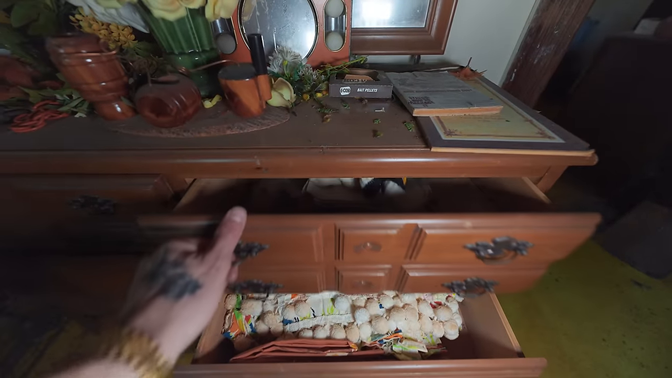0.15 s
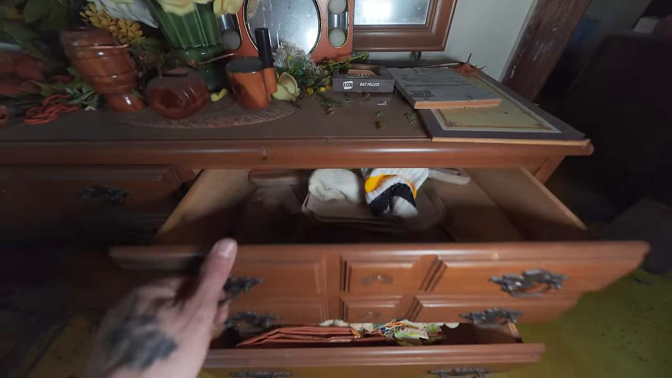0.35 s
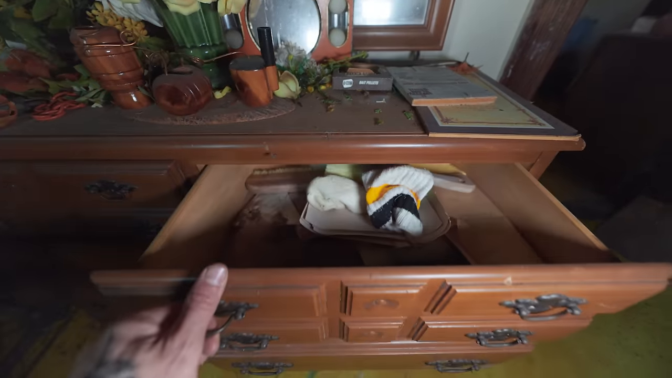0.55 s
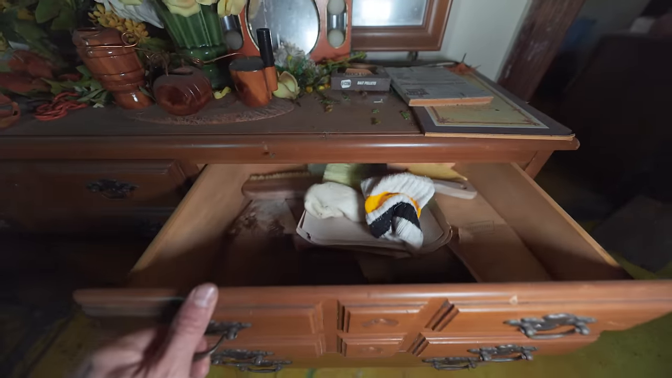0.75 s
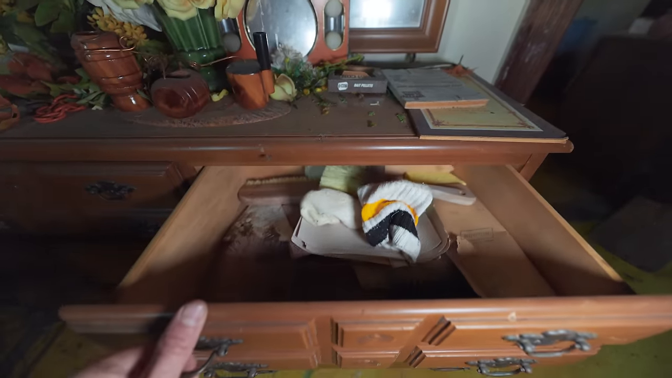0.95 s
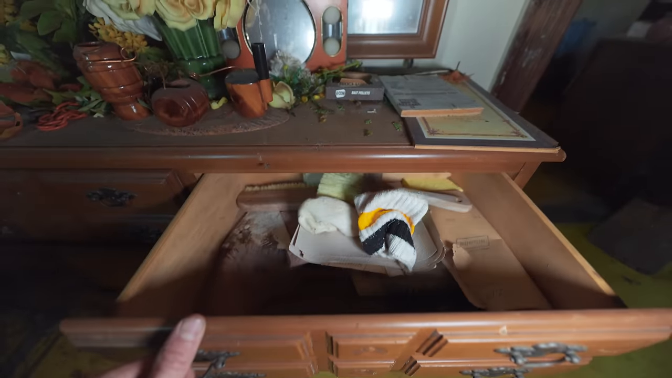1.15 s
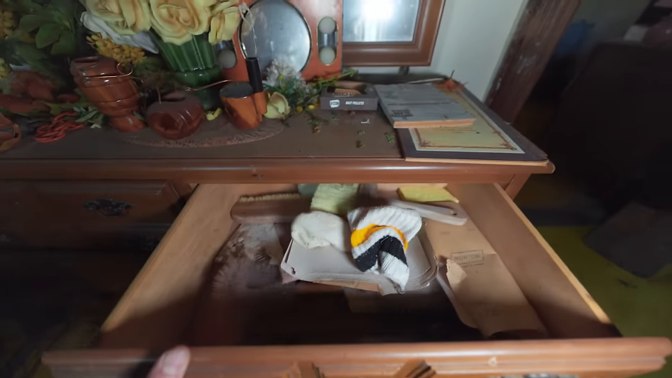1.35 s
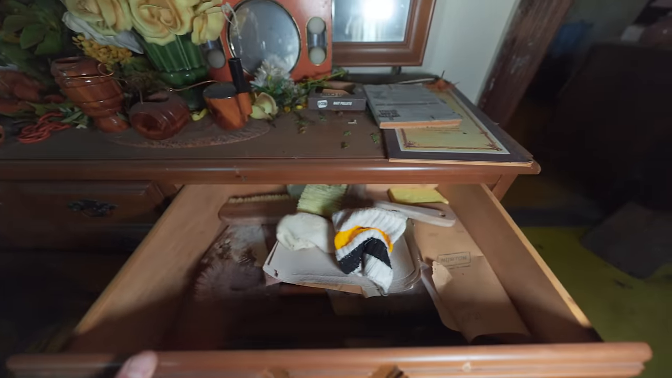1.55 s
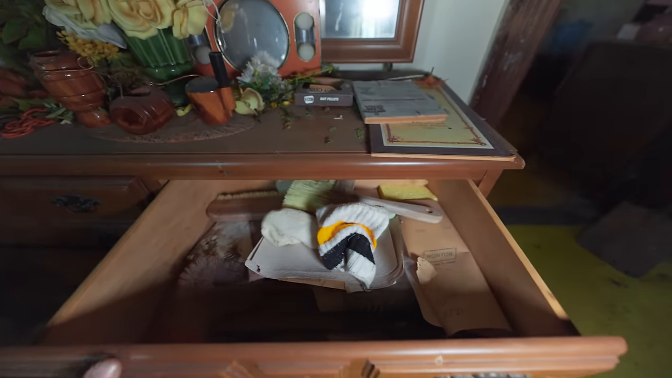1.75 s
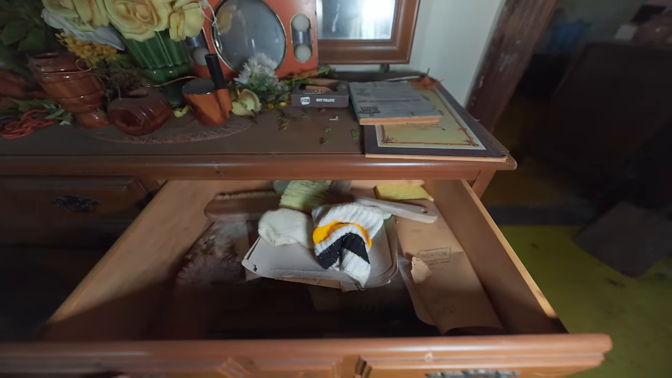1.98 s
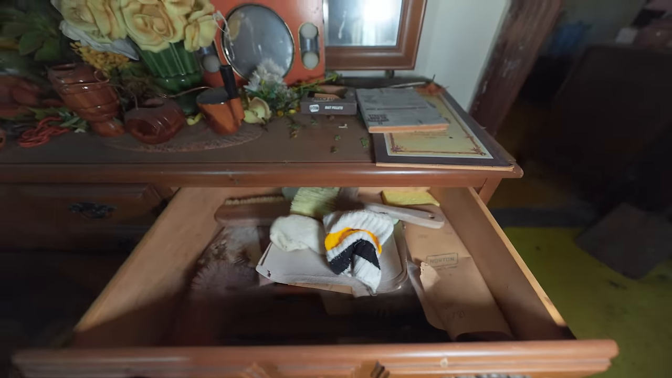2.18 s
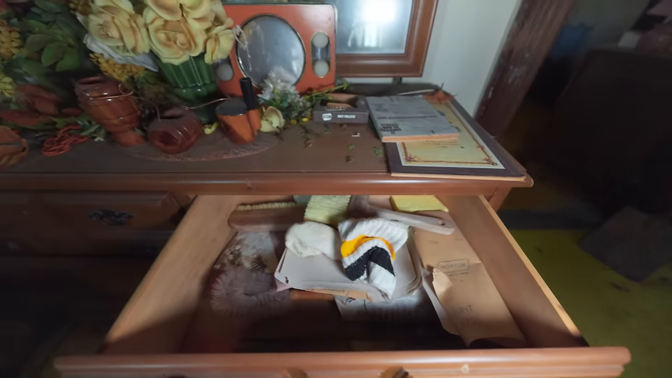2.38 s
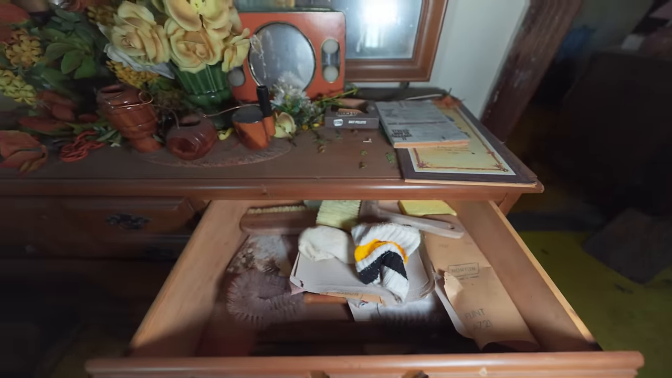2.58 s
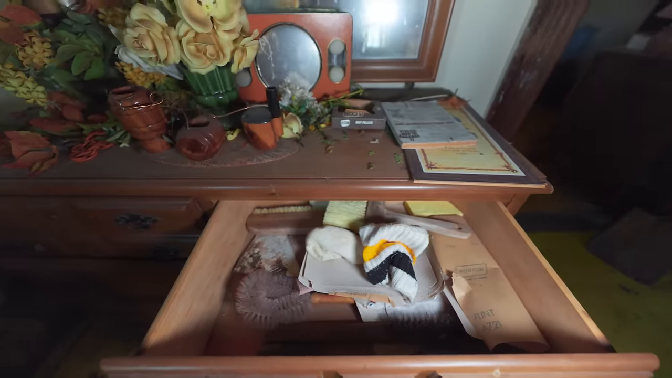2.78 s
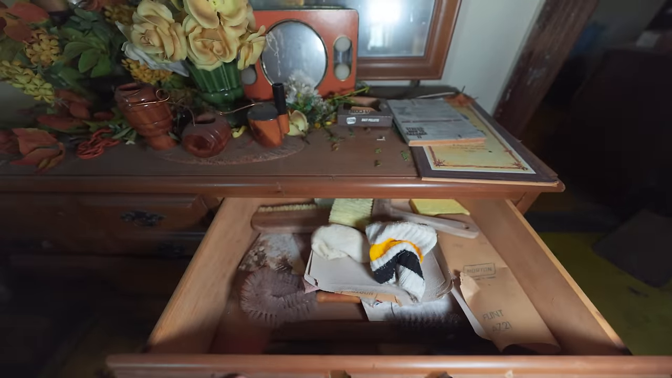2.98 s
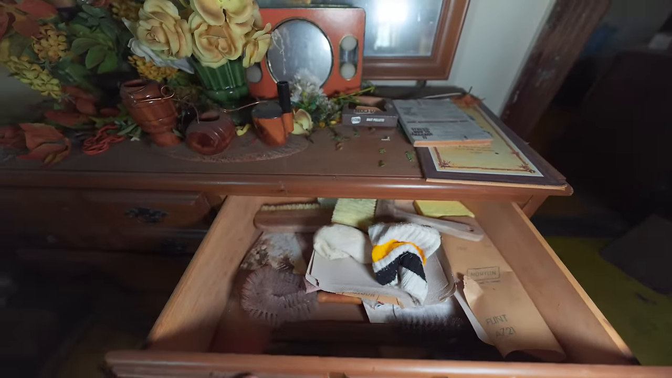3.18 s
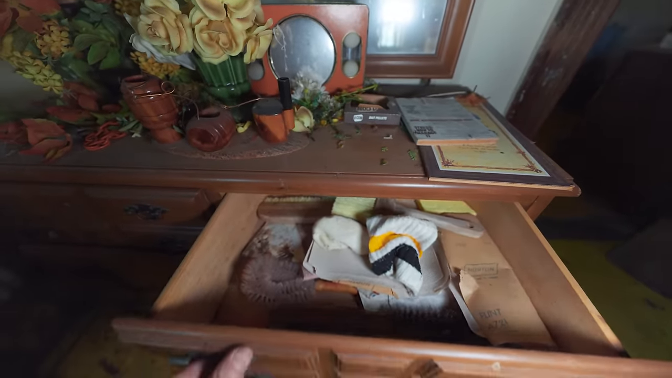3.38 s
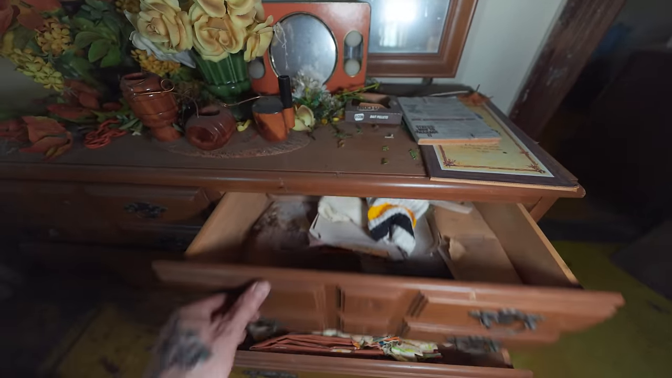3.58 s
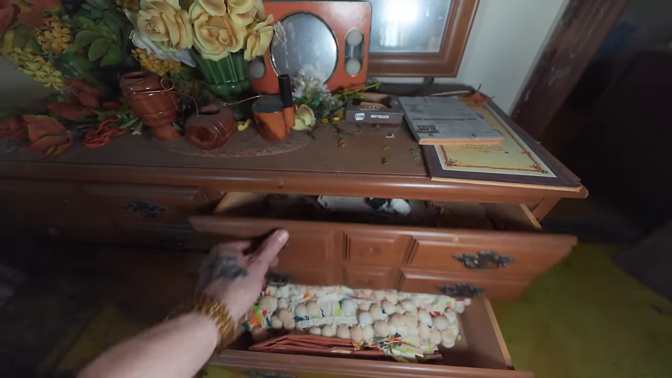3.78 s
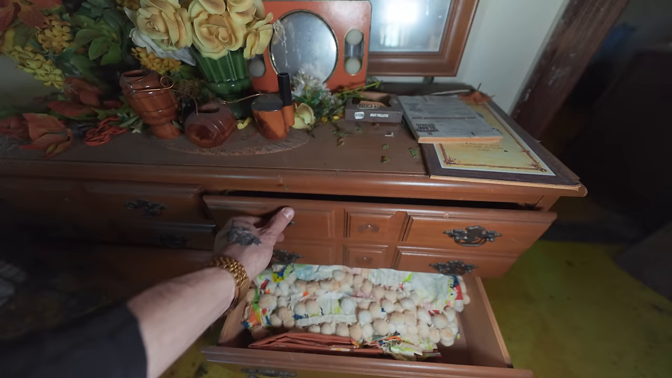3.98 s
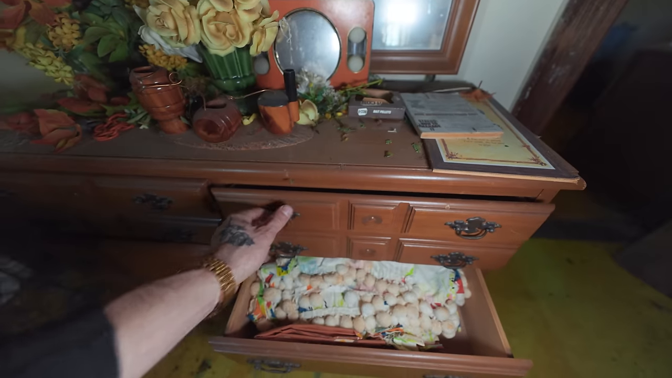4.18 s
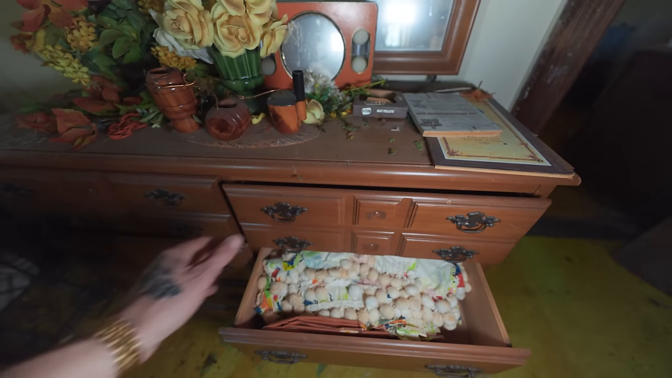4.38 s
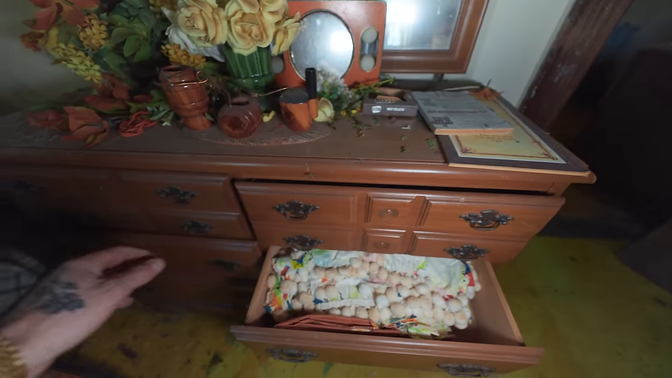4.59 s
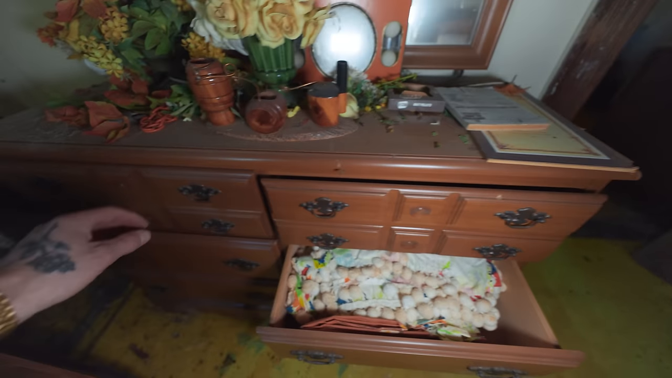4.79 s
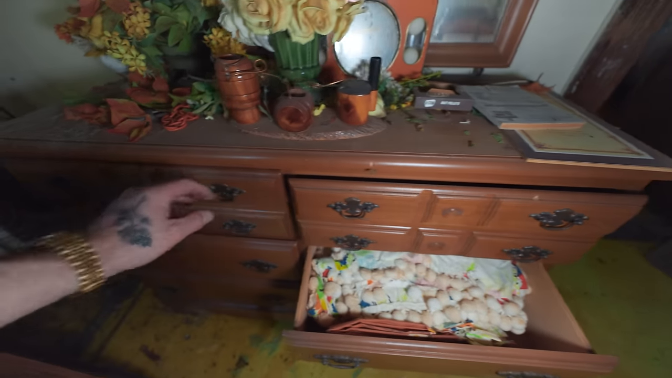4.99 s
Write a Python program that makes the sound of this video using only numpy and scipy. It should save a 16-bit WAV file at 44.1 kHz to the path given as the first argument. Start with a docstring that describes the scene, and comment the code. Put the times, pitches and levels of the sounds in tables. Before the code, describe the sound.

A wooden dresser drawer is heard close up in a small quiet room. It starts sliding out at once, with a hollow, juddering scrape and a few sharp catches, easing into softer rubbing by about 0.7 seconds. A second pull runs from about 1.1 to 2.2 seconds, with short wooden cracks around 1.4, 1.6 and 1.9. The drawer then mostly rests, with slight rubs and light clicks of loose fittings between 2.4 and 3.2 seconds. From 3.3 it is pushed back, scraping, rumbling and knocking on its runners, softening after 4.1. At 4.3 the hanging metal pull drops on its back plate with a sharp clack and bounces three times, each weaker. The drawer front bumps home at about 4.65 seconds with a firm cluster of wooden knocks. Faint rubbing and a small tick follow near 5 seconds over low room tone.

```python
"""A wooden dresser drawer, close to one microphone in a small quiet room.
It is pulled out in two stages, rests, and is pushed shut, rubbing, juddering and catching on its
wooden runners. Jolts set its hanging metal pull ringing; loose fittings click while it stands open.
Let go, the pull drops and bounces on its back plate, then the drawer front bumps home."""
import sys
import numpy as np
from scipy import signal
from scipy.fft import rfft, irfft, next_fast_len
from scipy.io import wavfile

SR = 44100
rng = np.random.default_rng(int(sys.argv[2]) if len(sys.argv) > 2 else 0)


def log_audio(samples):
    """Write samples as a 16-bit WAV file to the path given in sys.argv[1]."""
    # one column per channel
    frames = np.atleast_2d(samples).T
    # limit to full scale, then quantise
    limited = np.clip(frames, -1, 1)
    pcm = np.round(limited * 32767).astype(np.int16)
    wavfile.write(sys.argv[1], SR, pcm)


N = 222264
TIME = np.arange(N) / SR
TAIL = TIME[:SR * 3 // 5]  # time axis of one ring-out

# Levels in the tables are relative: each source adds its own gain.
# room tone: frequency_hz, level_db
ROOM_TONE_SPECTRUM = [(21, -39), (35, -7.5), (101, 4), (256, -14.5), (453, -8), (489, -15), (557, -13),
                      (864, -22), (2250, -20), (3490, -24.5), (3870, -26), (5020, -33), (8630, -29),
                      (13700, -28.5), (16900, -54.5)]
# room decay: frequency_hz, t60_s
ROOM_DECAY = [(100, 0.83), (500, 0.48), (1400, 0.79), (3700, 0.34), (10000, 0.32), (16000, 0.26)]

# moves of the drawer: contact, start_s, attack_s, slowing_from_s, release_s, sag_db_per_s,
# rub_db, sides_db, hiss_db, box_db
DRAWER_STROKES = [("pull", -0.14, 0.33, .46, 0.39, 22.2, -39.5, -52, -50, -36.5),
                  ("glide", 0.49, 0.22, 0.96, 0.19, 11.8, -50.5, -50, -64.5, -56),
                  ("pull", 1.117, 0.31, 1.42, 0.13, 0, -48, -54, -64.5, -64.5),
                  ("tipped", 1.637, 0.15, 2.003, 0.28, 0, -45.5, -64.5, -65, -53.5),
                  ("tipped", 2.36, 0.065, 2.52, 0.11, 0, -58, -82, -86, -62),
                  ("push", 2.9, 0.045, 2.77, 0.043, 0, -50, -46, -83, -57),
                  ("push", 3.06, 0.068, 3.21, 0.17, 0, -60.5, -75, -78, -63.5),
                  ("push", 3.27, 0.31, 3.91, 0.22, 0, -42.5, -54.5, -55.5, -40.5),
                  ("push", 3.7, 0.25, 5.1, 0.15, 15, -51, -77, -74, -46)]
# runner rub when pulled, gliding, tipped at full reach and pushed back: frequency_hz, level_db
PULLING_SPECTRUM = [(150, -27), (250, -10), (331, -19), (361, 2.5), (395, -12), (509, -1.5), (556, -10),
                    (673, 3), (825, -8), (1210, -5.5), (1420, -13.5), (2340, -12), (3330, -16.5),
                    (4300, -17.5), (5200, -52), (6760, -53), (11400, -120)]
GLIDING_SPECTRUM = [(150, -34), (250, -16), (342, -7.5), (381, -24), (437, -2), (551, -13), (705, 0),
                    (888, -13), (1170, -4), (1450, -20), (2400, -12.5), (2640, -18), (4260, -18),
                    (5020, -44), (6500, -45), (8450, -55), (14300, -120)]
TIPPED_SPECTRUM = [(150, -42), (250, -9.5), (398, -2), (430, 4), (509, -4), (751, -2.5), (960, -14),
                   (1430, -11.5), (1590, -8), (1860, -20), (2110, -11), (2310, -17), (4030, -21),
                   (4900, -53), (5500, -40), (7150, -66), (12100, -120)]
PUSHING_SPECTRUM = [(150, -41), (250, -9), (354, -2), (471, -4), (704, 1.5), (801, -6), (1280, -6.5),
                    (1610, -15.5), (1880, -13.5), (2060, -10), (2740, -11), (4030, -17.5), (4410, -19.5),
                    (4960, -43), (5500, -35), (7150, -50.5), (12100, -120)]
# hiss of the wood grain: frequency_hz, level_db
GRAIN_SPECTRUM = [(2650, -39), (4500, 2), (5110, -12.5), (6000, 0), (6490, -4), (8750, -8), (12800, -7.5),
                  (15100, -22), (16100, -43), (16900, -82)]
# hollow resonances of the drawer box and of its sides: pitch_hz, width_hz, level_db
BOX_RESONANCES = [(52, 14, -10), (89.3, 18, 3), (135, 12.5, 5.5), (194, 27, -4)]
SIDE_RESONANCES = [(676, 31, -6.5), (1138, 26, -3.5), (1258, 100, -10), (2615, 98, -9)]
# stick-slip judders of the box: middle_s, half_length_s, pitch_hz, level_db
BOX_JUDDERS = [(0.006, 0.056, 104, -31), (0.088, 0.036, 97, -29.5), (0.24, 0.042, 184, -36.5),
               (0.33, 0.045, 133, -26), (0.65, 0.098, 138, -44), (1.54, 0.014, 152, -43),
               (1.62, 0.054, 140, -44.5), (3.443, 0.02, 144, -33), (3.694, 0.072, 128, -33.5),
               (3.866, 0.052, 185, -37), (3.977, 0.036, 190, -36.5), (4.203, 0.01, 110, -37.5)]
# jolts that reach the hanging pull: start_s, level_db
PULL_JOLTS = [(0.056, -51), (3.9, -61), (3.974, -56)]

# blows on the carcass, runners, fittings and pull: start_s, level_db, bass_db, treble_db, spot_hz
CARCASS_KNOCKS = [(.016, -28.5, 12.5, -0.5, 222), (1.514, -31, 4, -22, 480), (3.407, -27, 6, -1.5, 540),
                  (3.436, -31.5, 8.5, -3, 284), (3.621, -23, 0, -15, 1154), (3.634, -27, 7, -19, 510),
                  (4.645, -11, -8.5, 1, 753), (4.651, -14.5, -8.5, -12, 405), (4.663, -13.5, 5, 5, 574),
                  (4.705, -19.5, -2.5, 9, 2485), (4.721, -25.5, 4, 13.5, 1600)]
RUNNER_CATCHES = [(.057, -19, -3, 4.5, 3830), (.061, -25, 2, 0, 1070), (.088, -25, -17, -10, 3700),
                  (.134, -23, -10, -1, 2300), (1.387, -23, -1, 1, 1370), (1.608, -17, -2.5, -2, 702),
                  (1.899, -23, 0.5, -9, 1080), (2.443, -43, 0, -22, 1100), (3.57, -26.5, -1, 3, 4450),
                  (3.827, -19, 0.5, -2.5, 1700), (3.974, -20.5, 3, 3, 1700), (4.132, -29, 0, -0.5, 1610),
                  (4.309, -30, -3.5, -12, 2010), (4.445, -18.5, 7, -17, 1080), (5.003, -42, 16.5, -3, 1076)]
FITTING_CLICKS = [(2.374, -28.5, 13, 2, 3770), (2.573, -30, 9, -8.5, 3330), (2.921, -23, 9, 2, 3350),
                  (2.924, -21.5, -6, -13, 3350), (3.08, -34, 11, -19, 3250), (3.201, -21.5, 5.5, 5, 3720),
                  (4.172, -20.5, -30, 0, 3650), (4.231, -15.5, -5.5, 4.5, 4940)]
PULL_BOUNCES = [(4.3127, -2.5, 1, -0.5, 4160), (4.4619, -10.5, 1, 1, 3530), (4.616, -18, 2.5, -1, 3520),
                (4.788, -26, -24, -6, 3800)]
# the crack of each kind of blow: frequency_hz, level_db
KNOCK_SPECTRUM = [(35, -40.5), (60, -14), (87, -5.5), (323, -11), (398, -10.5), (480, -13.5), (553, -12),
                  (822, -14.5), (1410, -20), (2350, -26), (4320, -29), (5210, -37.5), (11800, -38),
                  (14200, -45), (16000, -58)]
CATCH_SPECTRUM = [(180, -16.5), (300, -7), (420, -16), (686, -4), (1590, -3.5), (2930, -11), (3460, -9),
                  (4310, -10), (5020, -26.5), (7030, -14), (7920, -22.5), (11700, -22), (13600, -33),
                  (15300, -38), (16900, -96)]
CLICK_SPECTRUM = [(150, -59), (250, -19), (1060, -12), (1310, -11), (2000, -12), (2520, -3), (2800, -7),
                  (3400, -3), (3980, -7.5), (4670, -15), (6640, -12.5), (7250, -20), (12500, -21.5),
                  (15800, -35), (16900, -66)]
BOUNCE_SPECTRUM = [(180, -16.5), (300, -20.5), (600, -3), (1100, -10), (2300, -13), (3100, -7.5),
                   (3500, 2.5), (4300, -13.5), (4900, -14.5), (5600, -12.5), (8000, -6), (9800, -16.5),
                   (14200, -21.5), (16500, -39)]
# the modes each kind leaves ringing: pitch_hz, level_db, t60_s
KNOCK_RING = [(49, -12, .8), (88, -4, .5), (135, -8, .33), (198, -13, .14), (360, -7, .1), (405, -2, .15),
              (548, -3, .14), (689, -4, .08), (764, -2, .09), (812, 0, .08), (890, -2, .08), (977, -2, .08)]
CATCH_RING = [(692, -1.5, 0.11), (1205, -0.5, 0.041), (1360, -8, 0.062), (1600, 2, 0.017),
              (2530, -0.5, 0.027), (3354, 5, 0.014), (3470, -3.5, 0.029), (4150, -7, 0.015),
              (6360, -6.5, 0.016), (7100, -15, 0.018)]
CLICK_RING = [(368, -14.5, 0.1), (714, -11.5, 0.11), (1080, -4.5, 0.14), (1740, -4.5, 0.064),
              (2590, -1, 0.1), (3320, -3, 0.09), (3710, -8.5, 0.05), (4330, 0.5, 0.043), (4690, 2.5, 0.028),
              (6050, 2.5, 0.028), (8400, -4, 0.024), (9580, -0.5, .025)]
BOUNCE_RING = [(554, -19, .14), (1082, -6, .05), (1244, -16, .06), (1577, -16, .05), (2520, -18, .04),
               (3420, -8, .025), (3469, -22, .26), (3700, -9, .025), (4180, -4, .015), (4295, -1, .026),
               (4800, -12, .02), (7300, -11, .015), (8000, -5, .018), (8926, -12, .03), (10650, -14, .03),
               (10990, -26, .25), (11600, -13, .02), (12250, -13, .02), (14050, -12, .02)]


def amp(db):
    """Decibels to gain."""
    return np.exp(np.asarray(db) * (np.log(10) / 20))


def rms_one(x):
    """Scale to unit rms."""
    return x / np.sqrt(np.mean(x ** 2) + 1e-20)


def unit_energy(x):
    """Scale to unit energy."""
    return x / np.sqrt(np.sum(x ** 2, axis=-1, keepdims=True) + 1e-20)


def at_hz(points, hz):
    """Read a table on a log-frequency axis."""
    table_hz, value = np.transpose(points)
    return np.interp(np.log(np.maximum(hz, 1)), np.log(table_hz), value)


def coloured(x, spectrum):
    """Causal (minimum-phase) filter with the given spectrum."""
    length = x.shape[-1]
    size = 2 * next_fast_len(length // 2 + 2048, True)
    gain_db = at_hz(spectrum, np.arange(size // 2 + 1) * SR / size)
    cepstrum = irfft(gain_db * (np.log(10) / 20))
    cepstrum[1:size // 2] *= 2
    cepstrum[size // 2 + 1:] = 0
    return irfft(rfft(x, size) * np.exp(rfft(cepstrum)), size)[..., :length]


def drift(rate_hz):
    """A random wander of unit rms."""
    knots = rng.standard_normal(2000)
    return rms_one(np.interp(TIME * rate_hz, np.arange(len(knots)), knots))


def resonate(x, resonances):
    """Parallel resonances, each holding its given share of level."""
    out = 0
    for hz, width_hz, db in resonances:
        radius = np.exp(-np.pi * width_hz / SR)
        feedback = [1, -2 * radius * np.cos(2 * np.pi * hz / SR), radius * radius]
        out = out + amp(db) * rms_one(signal.lfilter([1, 0, -1], feedback, x))
    return rms_one(out)


def room_response(build_s, wall_s, wall_db):
    """Diffuse tail that dies sooner in the treble, with a swell of echoes from the far wall."""
    spectrum = rfft(rng.standard_normal(len(TAIL)))
    hz = np.arange(len(spectrum)) * SR / len(TAIL)
    centres = np.geomspace(80, 16000, 9)
    tail = 0
    for centre, weights in zip(centres, np.eye(len(centres))):
        band = irfft(spectrum * at_hz(np.c_[centres, weights], hz), len(TAIL))
        tail = tail + band * amp(-60 * TAIL / at_hz(ROOM_DECAY, centre))
    swell = 1 + amp(wall_db) * np.exp(-((TAIL - wall_s) / 0.019) ** 2)
    return unit_energy(tail * swell * (1 - np.exp(-TAIL / build_s)))


def in_room(x, room, wet_db):
    """What the room sends back to the microphone."""
    return amp(wet_db) * signal.fftconvolve(x, room)[:N]


def blows(events, colour, modes, room, wet_db, rise_s, crack_t60_s, ring_db, vary_db,
          spot_db, bass_hz, treble_hz):
    """Each blow is a crack of countless short modes plus a few that ring; hardness tilts its colour."""
    out = np.zeros((2, N + len(TAIL)))
    hz, mode_db, t60_s = np.transpose(modes)[:, :, None]
    partials = amp(mode_db - 60 * TAIL / t60_s) * np.sin(2 * np.pi * hz * TAIL)
    envelope = (1 - np.exp(-TAIL / rise_s)) * amp(-60 * TAIL / crack_t60_s)
    # summed over all directions the crack has a smooth spectrum: this is what fills the room
    smooth_crack = unit_energy(coloured(signal.unit_impulse(len(TAIL)), colour))
    for start_s, level_db, bass_db, treble_db, spot_hz in events:
        crack = unit_energy(coloured(rng.standard_normal(len(TAIL)) * envelope, colour))
        strengths = amp(rng.normal(0, vary_db, hz.shape)) * rng.choice([-1, 1], hz.shape)
        ring = amp(ring_db) * unit_energy(np.sum(strengths * partials, axis=0))
        tilt = [(bass_hz / 2, bass_db), (bass_hz * 2, 0), (treble_hz, 0), (treble_hz * 2, treble_db)]
        # the spot that is struck favours one narrow range of resonances
        spot = [(spot_hz / 1.18, 0), (spot_hz, spot_db), (spot_hz * 1.19, 0)]
        paths = np.array([crack + ring, smooth_crack + amp(-5) * ring])
        struck = unit_energy(coloured(paths, spot))
        start = int(start_s * SR)
        out[:, start:start + len(TAIL)] += amp(level_db) * coloured(struck, tilt)
    direct, radiated = out[:, :N]
    return direct + in_room(radiated, room, wet_db)


def room_tone():
    """The quiet room: a steady bed of noise, mostly bass."""
    return amp(-55.5) * rms_one(coloured(rng.standard_normal(N), ROOM_TONE_SPECTRUM))


def friction(per_s, spread_db, uneven_db):
    """Wood fibres snag and let go: dense tiny slips of uneven size, bunched by the grain."""
    slips = (rng.random(N) < per_s / SR) * rng.standard_normal(N)
    slips *= amp(spread_db * rng.standard_normal(N))
    return rms_one(slips * amp(uneven_db * drift(70)))


def stroke_speed(t, start_s, attack_s, slowing_s, release_s, sag_db_per_s):
    """The hand eases the drawer towards full speed (1), lets it sag and eases it to rest."""
    rise = np.clip((t - start_s) / attack_s, 0, 1)
    fall = np.clip(1 - (t - slowing_s) / release_s, 0, 1)
    sag = amp(-sag_db_per_s * np.maximum(t - start_s - attack_s, 0))
    return sag * np.sin(np.pi / 2 * rise * fall) ** 2


def drawer_slide(room, hiss_power):
    """Friction drives the runners, the sides, a fine hiss and the box, all following the stroke speed."""
    colours = {"pull": PULLING_SPECTRUM, "glide": GLIDING_SPECTRUM,
               "tipped": TIPPED_SPECTRUM, "push": PUSHING_SPECTRUM}
    runners = {contact: rms_one(coloured(friction(per_s=10000, spread_db=2, uneven_db=0.56), colour))
               for contact, colour in colours.items()}
    sides = resonate(friction(per_s=8000, spread_db=1, uneven_db=3.5), SIDE_RESONANCES)
    grain = rms_one(coloured(friction(per_s=15000, spread_db=-2, uneven_db=1.5), GRAIN_SPECTRUM))
    box = resonate(friction(per_s=1500, spread_db=2, uneven_db=1.5), BOX_RESONANCES)
    box *= amp(2.3 * drift(14))  # the rumble wavers
    out = np.zeros(N)
    for contact, start_s, attack_s, slowing_s, release_s, sag_db_per_s, *levels_db in DRAWER_STROKES:
        rub_gain, sides_gain, hiss_gain, box_gain = amp(levels_db)
        moving = (TIME > start_s) & (TIME < slowing_s + release_s)
        speed = stroke_speed(TIME[moving], start_s, attack_s, slowing_s, release_s, sag_db_per_s)
        wood = rub_gain * runners[contact][moving] + sides_gain * sides[moving] + box_gain * box[moving]
        out[moving] += speed * wood + speed ** hiss_power * hiss_gain * grain[moving]
    return out + in_room(out, room, wet_db=-10)


def box_judder(waver, overtone_db):
    """For a moment the slips lock to a resonance of the box and it groans."""
    out = np.zeros(N)
    wavering_time = np.cumsum(1 + waver * drift(40)) / SR
    for middle_s, half_s, hz, db in BOX_JUDDERS:
        near = np.abs(TIME - middle_s) < 4 * half_s
        phase = 2 * np.pi * hz * wavering_time[near]
        swell = np.exp(-((TIME[near] - middle_s) / half_s) ** 2)
        out[near] += amp(db) * swell * (np.sin(phase) + amp(overtone_db) * np.sin(2 * phase))
    return np.sqrt(2) * out


def carcass_knocks(room):
    """The drawer knocks dully against the carcass, hardest as it bumps home."""
    return amp(19.5) * blows(
        CARCASS_KNOCKS, KNOCK_SPECTRUM, KNOCK_RING, room, wet_db=-5, rise_s=0.00018, crack_t60_s=0.099,
        ring_db=-3, vary_db=0.5, spot_db=8.5, bass_hz=250, treble_hz=1253)


def pull_shiver(pitch_hz, t60_s):
    """Each jolt sets one high mode of the hanging pull ringing thinly."""
    out = np.zeros(N + len(TAIL))
    ring = amp(-60 * TAIL / t60_s) * np.sin(2 * np.pi * pitch_hz * TAIL)
    for start_s, db in PULL_JOLTS:
        start = int(start_s * SR)
        out[start:start + len(TAIL)] += amp(db) * ring
    return out[:N]


def runner_catches(room):
    """The drawer catches on its runners with short wooden cracks; the table also holds one last faint crack,
    voiced the same way, that sounds after the drawer is home."""
    return amp(15) * blows(
        RUNNER_CATCHES, CATCH_SPECTRUM, CATCH_RING, room, wet_db=-8, rise_s=0.0005, crack_t60_s=0.037,
        ring_db=0, vary_db=4.5, spot_db=7.5, bass_hz=920, treble_hz=3780)


def fitting_clicks(room):
    """Loose fittings click lightly and ring for an instant."""
    return amp(16) * blows(
        FITTING_CLICKS, CLICK_SPECTRUM, CLICK_RING, room, wet_db=-8, rise_s=0.0013, crack_t60_s=0.056,
        ring_db=0.5, vary_db=4.5, spot_db=3.5, bass_hz=900, treble_hz=3730)


def pull_bounces(room):
    """The metal pull drops on its back plate and bounces, weaker each time."""
    return amp(17.5) * blows(
        PULL_BOUNCES, BOUNCE_SPECTRUM, BOUNCE_RING, room, wet_db=-7, rise_s=0.00087, crack_t60_s=0.024,
        ring_db=2.5, vary_db=2, spot_db=6.5, bass_hz=890, treble_hz=4000)


def scene():
    """The drawer and its fittings close up, the small room behind them, in mono."""
    room = room_response(build_s=0.0028, wall_s=0.029, wall_db=-1)
    impacts = runner_catches(room) + fitting_clicks(room) + pull_bounces(room) + carcass_knocks(room)
    slide = drawer_slide(room, hiss_power=1.34)
    judder = box_judder(waver=0.0326, overtone_db=-28)
    shiver = pull_shiver(pitch_hz=11400, t60_s=0.45)
    return (room_tone() + slide + judder + impacts + shiver)[None]


def record(dry):
    """The microphone drops the deepest bass; the top of the band is cut steeply."""
    low_cut = signal.butter(4, 36, "high", fs=SR, output="sos")
    high_cut = signal.ellip(10, 0.2, 80, 16200, fs=SR, output="sos")
    return signal.sosfilt(high_cut, signal.sosfilt(low_cut, dry))


dry = scene()
out = record(dry)
log_audio(out)
```